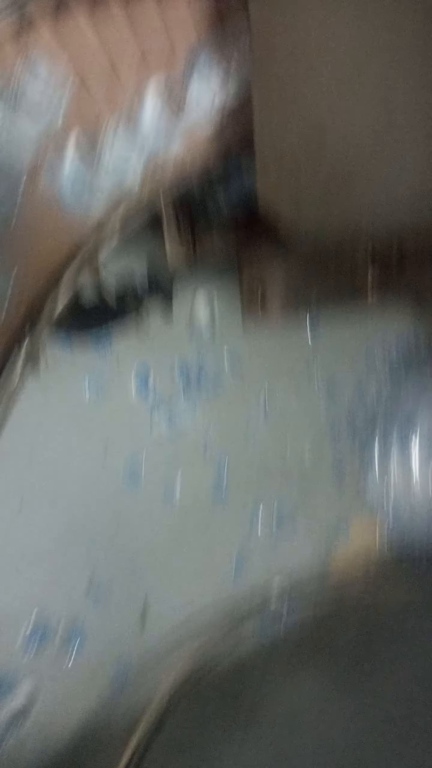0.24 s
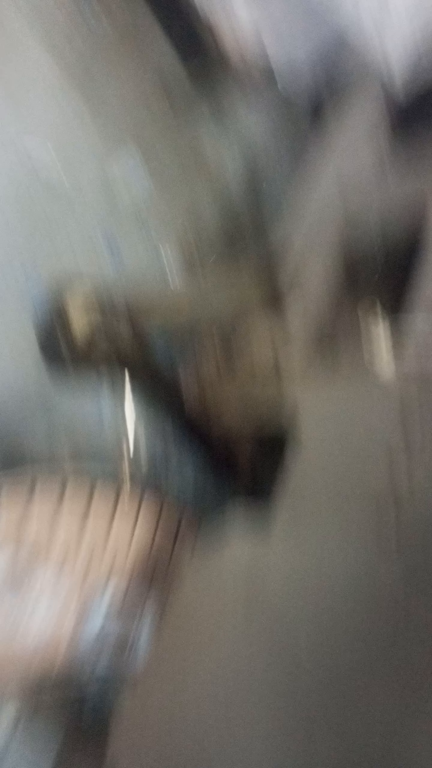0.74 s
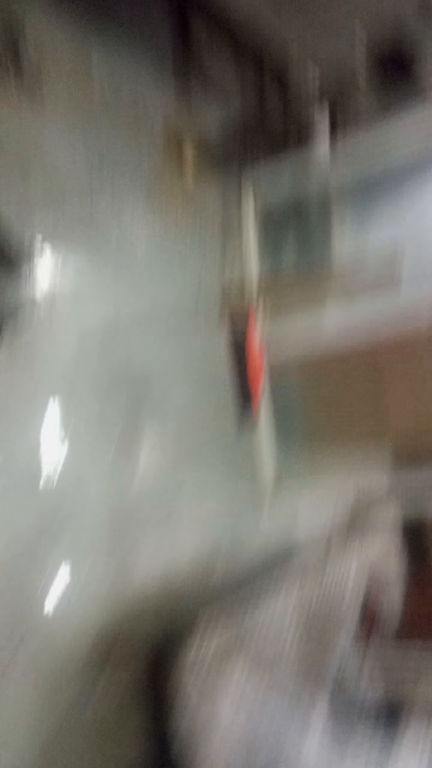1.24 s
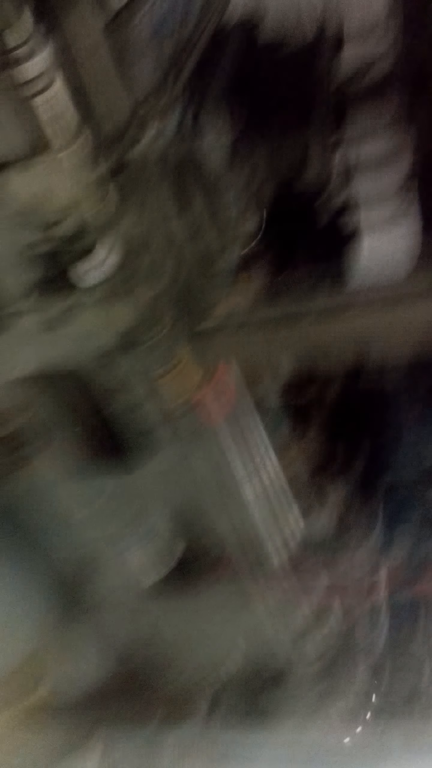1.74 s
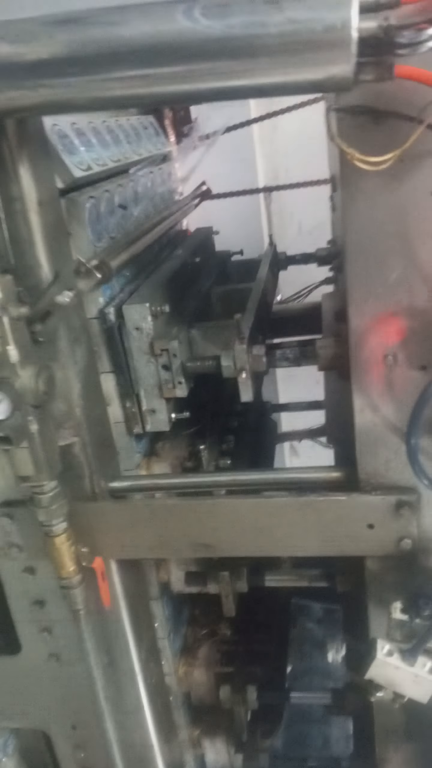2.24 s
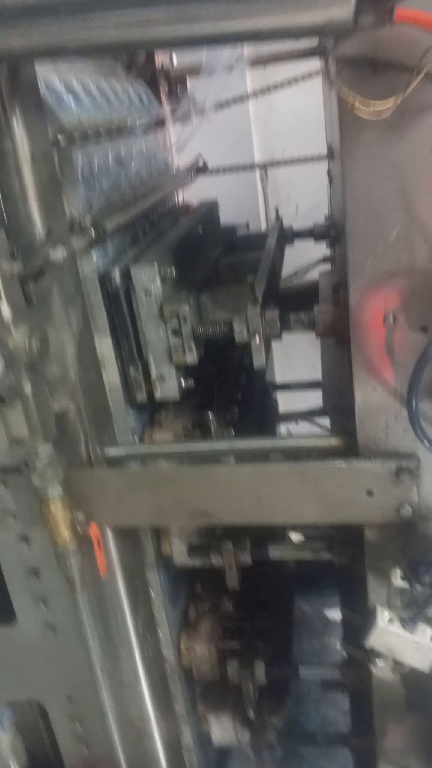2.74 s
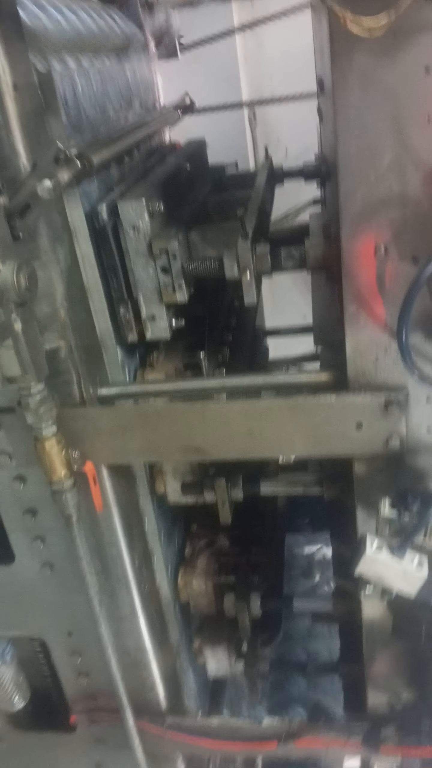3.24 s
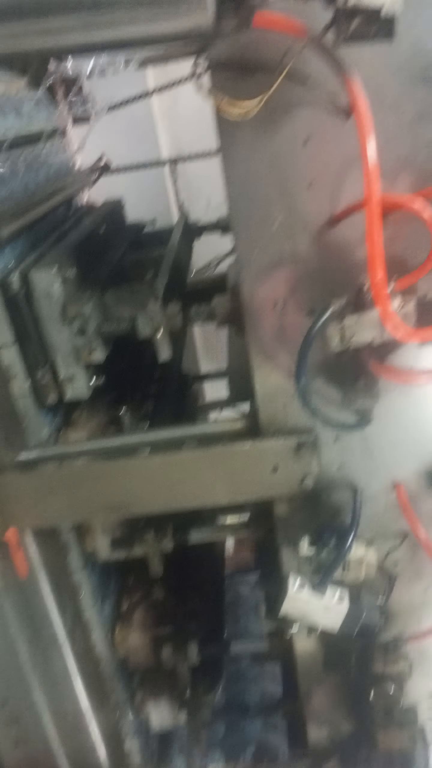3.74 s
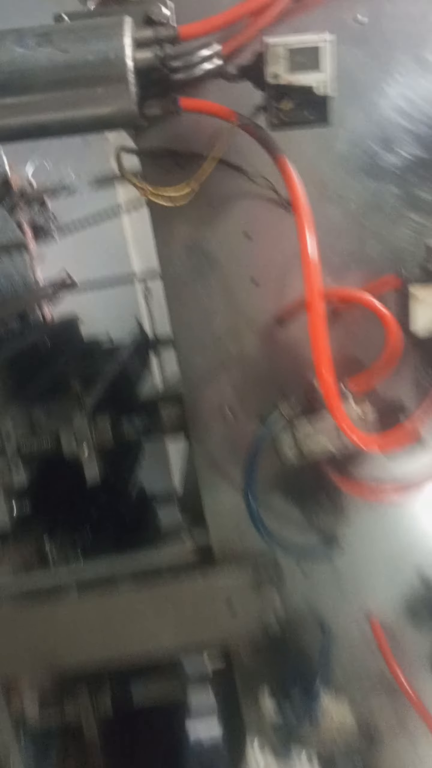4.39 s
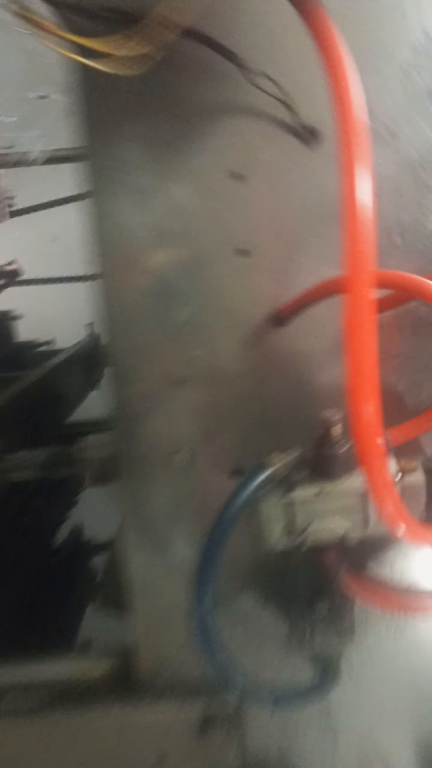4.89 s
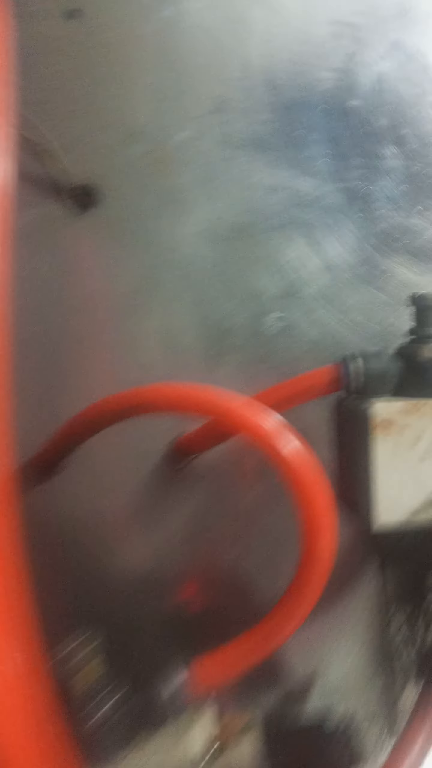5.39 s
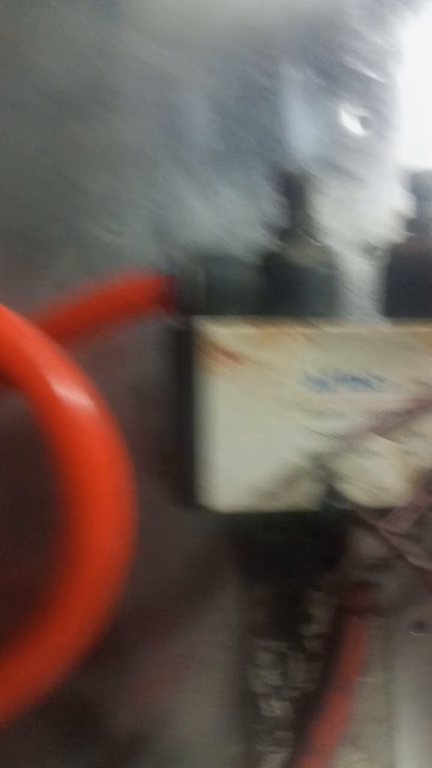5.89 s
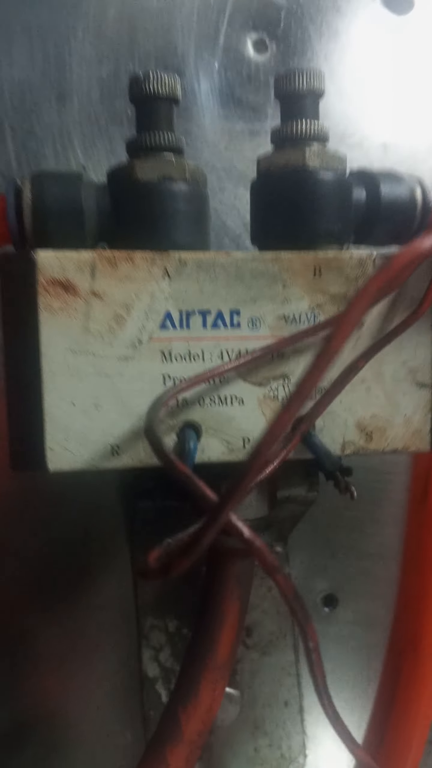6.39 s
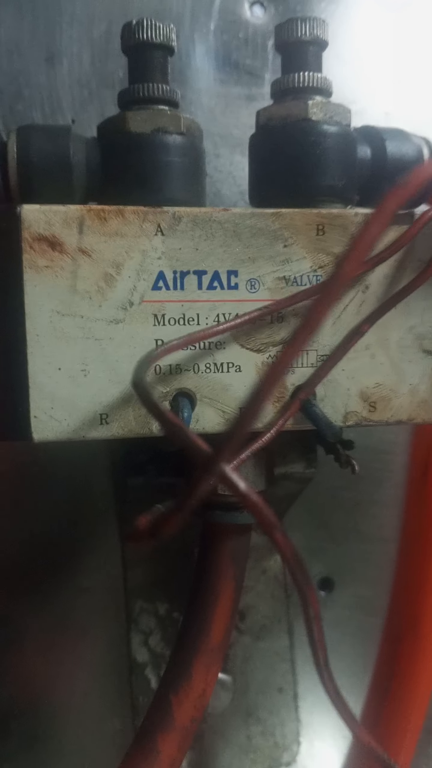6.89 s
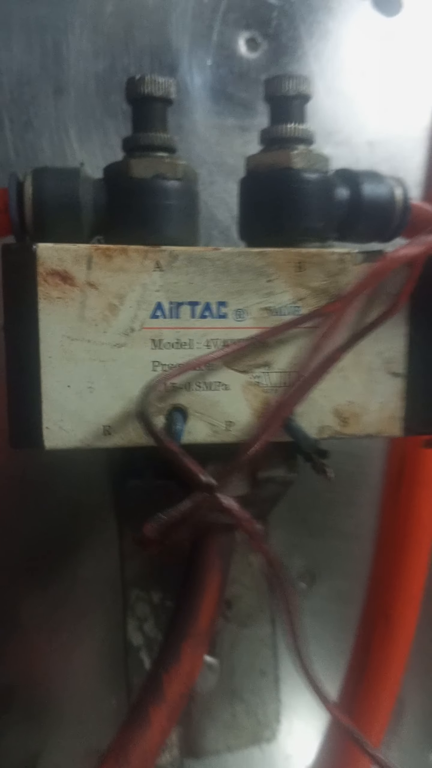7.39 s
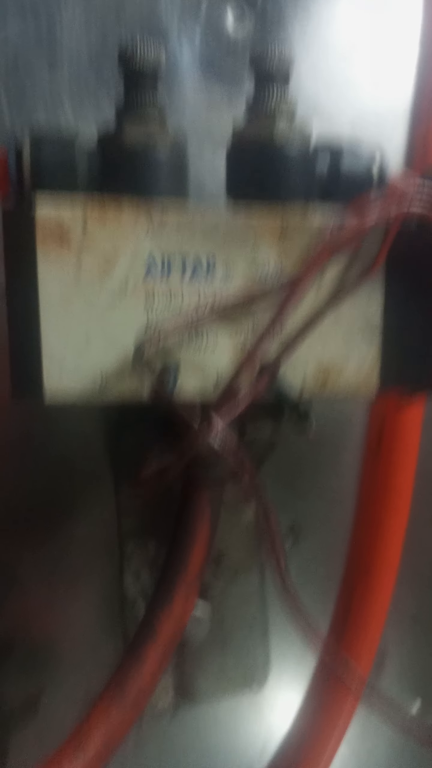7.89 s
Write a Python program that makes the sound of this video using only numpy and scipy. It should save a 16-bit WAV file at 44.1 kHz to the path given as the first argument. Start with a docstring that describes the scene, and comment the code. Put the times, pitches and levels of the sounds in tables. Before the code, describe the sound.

A pneumatic bottle machine cycles in a factory hall. A big air blast swells and snaps at about one second, softer spurts and rumbles follow, and another strong blast comes near four. The air thins to a faint hiss before seven, then a sharp valve click releases fresh gusts. A moving phone picks it up close, slightly watery and compressed.

```python
"""In a factory hall, a pneumatic bottle filler cycles about every three seconds, heard by a moving phone.
Exhaust air hisses broadly and fine port jets sizzle: both are noise built as random spectra with watery patches.
Cylinder strokes add rush and rumble round shifting resonances; short puffs of noise sing in cavities.
Throttles whistle as wavering sines and valve spools snap as filtered ticks.
Steady leaks and distant machines lie behind; the phone colours, suppresses and limits the sum."""
import sys
import numpy as np
from scipy import signal
from scipy.fft import rfft, irfft, next_fast_len
from scipy.io import wavfile
from scipy.ndimage import uniform_filter1d

SR = 44100
rng = np.random.default_rng(int(sys.argv[2]) if len(sys.argv) > 2 else 0)


def bounce(signal):
    """Save signal as a 16-bit WAV file at the path given by the first command-line argument."""
    frames = np.transpose(np.atleast_2d(signal))
    limited = np.clip(frames, -1, 1)
    pcm = np.round(limited * 32767).astype(np.int16)
    wavfile.write(sys.argv[1], SR, pcm)


N = 358533  # samples
CONTROL_S = np.arange(0, N / SR + .1, .002)  # time grid of the slow level curves

# Air escaping from the exhausts.
# Each row: time in seconds, level in dB, brightness in dB per octave.
EXHAUST = [(0.0, -20, .5), (0.6, -24.5, -5), (1.04, -27, -4), (1.06, -20, 4.5), (1.27, -11, 3.5),
           (1.43, -10.5, .5), (1.48, -16, 1.5), (1.86, -19, -.2), (2.26, -22.5, -3), (2.29, -19, -0.5),
           (2.38, -19.5, 3), (2.4, -24.5, 2.5), (2.56, -15.5, -.5), (2.8, -21, -1), (3.01, -17, .7),
           (3.55, -25.5, -4.5), (3.96, -27, -3.5), (4.07, -22, 3.5), (4.2, -8.5, 3.5), (4.24, -14.5, 0.5),
           (4.39, -11, 2), (4.64, -20.5, 0), (4.73, -17, 0.1), (5.14, -19.5, 1.1), (5.28, -17.5, 2),
           (5.3, -23.5, 1.5), (5.43, -16.5, .1), (5.62, -16, -0.7), (5.93, -20, 1.5), (6.11, -17, 1.8),
           (6.5, -25.5, -2), (6.73, -33.5, -4.5), (6.89, -35.5, -10), (6.91, -28.5, 4), (7.04, -29.5, 3),
           (7.14, -21, 3), (7.19, -26.5, 0), (7.38, -25.5, 4), (7.61, -20.5, 0), (7.7, -23.5, 3.5),
           (7.83, -18.5, 1.7), (8.13, -21, 1.9)]
# How much of the finest hiss reaches the moving phone.
# Each row: time in seconds, gain in dB.
TREBLE_REACH = [(0.0, -4), (.9, -3), (1.7, -0.5), (2.9, 0.5), (4.2, -2.5), (5.5, 4), (6.3, -1), (6.85, 4.5),
                (7.0, -7), (7.5, 1.5), (8.13, 2)]


def hiss():
    """Jet noise of the exhausts: its spectrum tips about 4 kHz as the pressure changes."""
    # Each row: frequency in Hz, relative density in dB per Hz.
    colour = [(900, -35.5), (1750, -12.5), (2200, -2), (3200, -1), (4500, -3), (6200, -1), (7200, -11),
              (8600, -18), (9500, -32), (13000, -50), (16000, -36)]

    def shape_db(hz, t):
        brightness = follow(EXHAUST, t)[1]
        octaves = np.log2(np.clip(hz, 2300, 6200) / 4000)
        return read(colour, hz) + brightness * octaves

    return patchy_noise(shape_db, lambda t: follow(EXHAUST, t)[0], (2000, 7000), frame=1024,
                        patch_hz=90, patch_s=.045, flicker_db=0.61, depth=patch_depth)


def sizzle():
    """Jet noise scales up in frequency as the opening narrows: fine ports give a high peak and a fizz below."""
    # Each row of both: frequency in Hz, relative density in dB per Hz.
    peak_colour = [(12500, -36), (13900, -12), (14600, -11), (15300, -4), (16000, 4)]
    fizz_colour = [(7000, -28), (8500, 0), (9500, 0.5), (11500, -5), (13200, -10), (15000, -14)]
    peak = patchy_noise(lambda hz, t: read(peak_colour, hz), jets, (14200, 15700),
                        frame=256, patch_hz=400, patch_s=.025, flicker_db=0.5, depth=patch_depth)
    fizz = patchy_noise(lambda hz, t: read(fizz_colour, hz), fizzing, (9300, 10900),
                        frame=512, patch_hz=200, patch_s=0.021, flicker_db=1.3, depth=patch_depth)
    return peak + fizz


def jets(t):
    """Level in dB of flow through a valve port: quick opening, slow sag, quick shutting, trapped air bleeding."""
    # Valve ports opening near the phone. Each row: start in seconds, time open in seconds,
    # level of the fine jet in dB, level of its after-bleed relative to that in dB.
    ports = [(-.1, .13, -35, -12), (.12, .42, -48, -10), (.91, .13, -46, -10), (1.054, .49, -26.5, -11),
             (2.275, 0.29, -33.5, -11), (2.85, .22, -39, -7), (3.974, .57, -30, -5), (5.205, .45, -38, -5),
             (5.94, 0.19, -39, -5), (6.9035, 0.48, -30, -3), (7.682, .2, -42, -5), (8.0, .2, -38, -8)]
    rise_s, sag_db_per_s, shut_db_per_s = 0.016, 1, 220
    tail_db_per_s, steady_leak_db = 13, -53
    start, open_s, db, tail_db = np.transpose(ports)[:, :, None]
    age = CONTROL_S - start
    shut = np.maximum(age - open_s, 0)
    opening_db = 20 * np.log10(np.clip(age / rise_s, 1e-4, 1))
    flow_db = db - sag_db_per_s * np.minimum(age, open_s) + opening_db
    closing_db = power_sum(-shut_db_per_s * shut, tail_db - tail_db_per_s * shut)
    leak_db = steady_leak_db + follow(TREBLE_REACH, CONTROL_S)[0]
    return np.interp(t, CONTROL_S, power_sum(leak_db, *(flow_db + closing_db)))


def fizzing(t):
    """Powers of unrelated flows add: fizz in dB follows the exhaust air, more when it is bright, and the jets."""
    level_db, brightness = follow(EXHAUST, t)
    exhaust_db = -43 + 0.65 * (level_db + 16) + brightness
    jet_db = jets(t) - 21
    return power_sum(exhaust_db, jet_db) + follow(TREBLE_REACH, t)[0]


def patch_depth(t):
    """Watery patchiness left by the phone's noise suppression: a depth factor that grows while near valves sizzle."""
    slow_jet_db = uniform_filter1d(jets(t), size=40)
    return np.clip(1.05 + 0.028 * (slow_jet_db + 40), .3, 2.2)


def rush():
    """Cavity resonance: hose and cylinder air gathers round a centre that each stroke shifts."""
    # Each row: ratio to the centre frequency, relative density in dB per Hz.
    resonance = [(.3, -17), (.6, -4), (.85, -2), (1.01, -1), (1.2, 0.5), (1.7, -3.5), (3, -14), (9, -60)]
    flow = strokes(column=4, share=1, sag=0.066, idle_db=-45.5, idle_hz=1200)
    return patchy_noise(lambda hz, t: read(resonance, hz / follow(flow, t)[1]),
                        lambda t: follow(flow, t)[0], (600, 1800), frame=1024,
                        patch_hz=90, patch_s=.04, flicker_db=0.24, depth=patch_depth)


def rumble():
    """Structural resonance: the frame vibrates as noise and each stroke favours another panel."""
    # Each row: ratio to the centre frequency, relative density in dB per Hz.
    resonance = [(.25, -11), (.6, -4.5), (1.01, -3), (1.5, -4), (2.5, -10), (5, -34), (15, -60)]
    shake = strokes(column=6, share=1.037, sag=0.36, idle_db=-47.5, idle_hz=294)
    return patchy_noise(lambda hz, t: read(resonance, hz / follow(shake, t)[1]),
                        lambda t: follow(shake, t)[0], (70, 550), frame=2048,
                        patch_hz=60, patch_s=.05, flicker_db=0.33, depth=lambda t: .9)


def strokes(column, share, sag, idle_db, idle_hz):
    """Power-weighted resonance: strokes rise, hold and fall, and the loudest sets the centre.

    Returns rows of time (s), level (dB), centre (Hz); share scales the hold, sag is the
    drop of the centre in octaves over a fall."""
    # Cylinder strokes. Each row: start, rise, hold and fall in seconds, rush level in dB,
    # rush centre in Hz, rumble level in dB, rumble centre in Hz.
    cylinders = [(-.1, 0.042, 0.065, 0.063, -39, 680, -21, 170),
                 (0.176, 0.03, 0.035, .15, -52, 870, -39, 270),
                 (.44, 0.092, .05, 0.091, -49, 1500, -39.5, 380),
                 (0.562, 0.065, .03, 0.46, -33.5, 1350, -34, 257),
                 (.9, .08, 0.034, .1, -44, 1300, -37, 236), (0.988, 0.16, .17, .12, -19, 1200, -24.5, 370),
                 (1.293, 0.067, 0.083, 0.25, -17.5, 1050, -21.5, 244),
                 (1.423, 0.1, 0.2, 0.19, -25, 1200, -27.5, 326),
                 (1.69, 0.077, 0.083, 0.18, -33, 694, -22.5, 283),
                 (1.801, 0.099, 0.058, 0.089, -28.5, 720, -19.5, 271),
                 (1.99, 0.044, 0.05, 0.044, -35.5, 1200, -31.5, 204),
                 (2.269, 0.031, 0.073, 0.054, -22.5, 1170, -29, 420),
                 (2.392, 0.13, 0.026, .13, -22, 1030, -27.5, 400),
                 (2.496, 0.073, 0.093, .06, -33, 705, -22.5, 262),
                 (2.669, 0.022, 0.062, 0.087, -37.5, 1540, -30, 140),
                 (2.826, 0.12, 0.071, 0.12, -23, 890, -21, 242),
                 (3.011, 0.029, 0.043, 0.059, -48, 900, -24.5, 175),
                 (3.43, 0.055, .03, .1, -38, 1620, -58, 350),
                 (3.6, 0.073, 0.051, 0.091, -36.5, 1490, -60, 330),
                 (3.933, 0.23, .06, .1, -19.5, 1170, -24.5, 300),
                 (4.235, 0.046, 0.21, 0.32, -18.5, 1020, -21.5, 344),
                 (4.624, .11, 0.1, 0.041, -24.5, 1250, -33, 393),
                 (4.83, 0.055, 0.042, 0.055, -37, 1050, -27, 250),
                 (4.912, 0.034, 0.073, 0.12, -30.5, 1087, -30.5, 350),
                 (5.014, 0.055, 0.058, 0.12, -29.5, 1260, -27, 343),
                 (5.164, 0.066, 0.03, 0.11, -26, 1350, -32, 184),
                 (5.266, 0.16, .06, 0.21, -24, 1400, -33.5, 289),
                 (5.559, 0.054, 0.076, 0.066, -31, 1317, -32, 410),
                 (5.705, .04, 0.099, 0.022, -40, 1190, -31, 154),
                 (5.891, 0.05, 0.092, 0.065, -33.5, 1200, -29.5, 167),
                 (5.993, 0.07, .05, .14, -25.5, 1120, -39, 324),
                 (6.103, 0.044, 0.019, 0.077, -41, 1300, -27, 300),
                 (6.886, 0.021, 0.1, .1, -36.5, 1340, -51, 244),
                 (6.996, .13, 0.029, 0.041, -23.5, 1250, -30.5, 456),
                 (7.15, 0.14, 0.3, 0.14, -29, 1300, -48, 290),
                 (7.413, 0.16, 0.055, 0.068, -21.5, 1200, -30, 427),
                 (7.622, 0.13, 0.093, .1, -25.5, 1370, -30.5, 376),
                 (7.805, 0.063, 0.051, 0.17, -24.5, 1040, -28.5, 164),
                 (7.945, 0.058, 0.16, .1, -29.5, 1400, -31.5, 336)]
    range_db = 25  # climb in a rise, drop in a fall
    rows = np.transpose(cylinders)[:, :, None]
    start, rise, hold, fall = rows[:4]
    age = CONTROL_S - start
    fallen = np.maximum(age - rise - share * hold, 0) / fall
    below = np.maximum(rise - age, 0) / rise + fallen
    power = gain_of(rows[column] - range_db * below) ** 2 * (age > 0)
    idle_power = gain_of(idle_db) ** 2
    total = power.sum(axis=0) + idle_power
    octaves = np.log2(rows[column + 1]) - sag * np.minimum(fallen, 1)
    centre = ((power * octaves).sum(axis=0) + idle_power * np.log2(idle_hz)) / total
    return np.transpose([CONTROL_S, 10 * np.log10(total), 2 ** centre])


def puffs():
    """Noise-driven cavity resonance: narrow noise on a carrier that climbs and drifts, swelling and shutting off."""
    # Each row: start in seconds, length in seconds, share of the length spent rising,
    # centre in Hz, width in Hz, level at the top of the swell in dB.
    cavities = [(.635, 0.081, 0.44, 224, 120, -29.5), (0.63, 0.15, 0.13, 1400, 300, -30.5),
                (0.642, 0.1, 0.12, 2128, 550, -25), (0.711, 0.09, 0.49, 623, 218, -36),
                (1.74, 0.11, 0.28, 2656, 1200, -21.5), (2.29, 0.13, .4, 3280, 252, -32),
                (2.69, .08, .4, 2700, 200, -27.5), (2.86, .1, .4, 12300, 600, -44),
                (3.452, 0.065, 0.47, 2310, 450, -24), (3.681, 0.13, 0.43, 1505, 240, -33),
                (5.8, 0.046, .4, 1620, 141, -30), (4.79, 0.12, .45, 970, 200, -31),
                (4.797, .3, 0.33, 414, 90, -32), (5.051, 0.081, 0.35, 365, 110, -27),
                (5.234, 0.091, .45, 1380, 260, -30), (5.43, 0.081, 0.36, 1010, 200, -32),
                (5.501, 0.071, 0.4, 516, 120, -30.5), (5.6, 0.12, 0.6, 488, 96, -32),
                (6.2, 0.56, 0.083, 2680, 250, -28.5), (6.927, 0.68, 0.55, 1338, 275, -32.5),
                (6.982, 0.096, 0.37, 4900, 250, -33), (7.05, .12, 0.8, 4600, 1940, -13.5),
                (7.241, .089, 0.49, 1640, 290, -31), (7.41, 0.11, .45, 3884, 300, -28),
                (7.442, .09, 0.71, 5650, 250, -27), (7.45, 0.24, 0.27, 12300, 900, -39),
                (7.46, 0.179, 0.53, 460, 130, -26.5), (7.518, 0.19, .4, 3400, 300, -23.5),
                (7.548, 0.096, 0.37, 5360, 370, -30), (7.6, 0.075, 0.59, 200, 102, -36),
                (7.924, 0.12, .42, 2440, 200, -28)]
    climb, wander, wander_s = .04, .025, .05  # shares of the centre; pace of the drift
    out = np.zeros(N)
    for s, length, rise, hz, width, level_db in cavities:
        t = np.arange(0, length, 1 / SR)
        a, b, drift = rng.standard_normal((3, SR))
        # Low-passed complex noise, moved up by the carrier, becomes a band of the full width.
        lowpass = signal.butter(3, width / 2, fs=SR, output="sos")
        noise = evened(signal.sosfilt(lowpass, a)) + 1j * evened(signal.sosfilt(lowpass, b))
        drift = uniform_filter1d(drift, round(wander_s * SR))
        drift = evened(uniform_filter1d(drift, size=800))
        centre = hz * (1 + climb * (t / length - .5) + wander * drift[:len(t)])
        carrier = np.exp(2j * np.pi * np.cumsum(centre) / SR)
        sung = (noise[-len(t):] * carrier).real
        swell = np.interp(t / length, [0, np.clip(rise, .05, .95), 1], [0, 1, 0]) ** 1.5
        out[round(s * SR):][:len(t)] += gain_of(level_db) * swell * sung
    return out


def whistles():
    """Edge tones of air in the throttles: a sine that sags, sputters and wavers."""
    # Each row: start in seconds, length in seconds, mean pitch in Hz, starting level in dB,
    # change of level over the length in dB.
    throttles = [(1.84, .04, 11330, -50, -9), (1.89, .105, 11200, -39.5, 4), (1.991, 0.11, 11185, -42, 6),
                 (2.875, .035, 12430, -46, .1), (2.897, 0.15, 11880, -33, -22),
                 (2.9, 0.068, 12150, -42, -8), (4.95, 0.081, 11100, -44, -1.1),
                 (5.047, 0.13, 11190, -35.5, .1), (8.033, .09, 11120, -52, 8)]
    sag_hz_per_s, waver_hz, sputter_db = 230, 12, 3.9
    out = np.zeros(N)
    for s, length, hz, level_db, change_db in throttles:
        t = np.arange(0, length, 1 / SR)
        slow = uniform_filter1d(rng.standard_normal((2, SR)), size=500)
        waver, sputter = evened(slow, axis=1)[:, :len(t)]
        pitch = hz - sag_hz_per_s * (t - length / 2) + waver_hz * waver
        tone = np.sqrt(2) * np.sin(2 * np.pi * np.cumsum(pitch) / SR)
        gain = gain_of(level_db + change_db * t / length + sputter_db * sputter)
        whistle = gain * tone * signal.windows.tukey(len(t), .3)
        part = out[round(s * SR):][:len(t)]
        part += whistle[:len(part)]
    return out


def snaps():
    """Impact excitation: each valve spool snaps over with a sharp broad tick and a little rattle behind it."""
    # Each row: time in seconds, peak level in dB.
    spools = [(1.054, -15), (2.282, -19), (3.974, -20), (6.9035, -11)]
    out, t = np.zeros(N), np.arange(400) / SR
    band = signal.butter(3, [300, 7000], "band", fs=SR)
    for s, peak_db in spools:
        rattle = 0.16 * rng.standard_normal(len(t)) * np.exp(-t / 0.0013)
        crack = signal.lfilter(*band, (t == 0) + rattle)
        out[round(s * SR):][:len(t)] += gain_of(peak_db) * crack / abs(crack).max()
    return out


def hall():
    """Many distant sources sum to steady noise: leaks and machines in the hall, far and even."""
    # Each row: frequency in Hz, relative density in dB per Hz.
    colour = [(60, -19), (130, -1), (400, 4), (800, -1), (1500, -17), (1900, -18), (2600, -6.5), (6500, 1),
              (7400, 0), (9000, -2.5), (9500, -54), (13500, -36), (15000, -16), (16000, -16)]
    return patchy_noise(lambda hz, t: read(colour, hz), lambda t: -36.5, (50, 16000), frame=1024,
                        patch_hz=300, patch_s=0.089, flicker_db=.2, depth=lambda t: .25)


def patchy_noise(shape_db, level_db, band, frame, patch_hz, patch_s, flicker_db, depth):
    """Noise as random short-time spectra: suppression leaves watery patches in time and frequency.

    level_db sets the power inside band (Hz); a flicker shakes all bins together."""
    # Each row: frequency in Hz, depth of the watery patches in dB where the depth factor is 1.
    patchy = [(100, 1), (500, 5), (1500, 2), (4000, 2.5), (9000, 2.5), (15000, 1.5)]
    hop = frame // 4
    t = np.arange(N // hop + 5) * hop / SR
    hz = np.fft.rfftfreq(frame, 1 / SR)[:, None]
    a, b, patches = rng.standard_normal((len(t), len(hz), 3)).T
    for _ in range(2):
        patches = uniform_filter1d(patches, max(1, round(patch_hz * frame / SR)), axis=0)
        patches = uniform_filter1d(patches, max(1, round(patch_s * SR / hop)), axis=1)
    flicker = evened(uniform_filter1d(rng.standard_normal(len(t)), size=3))
    shape = gain_of(shape_db(hz, t) + 0 * t)
    inside = (hz[:, 0] > band[0]) & (hz[:, 0] < band[1])
    shape = shape / np.sqrt((shape[inside] ** 2).sum(axis=0))  # unit power in the band at every moment
    patch_db = read(patchy, hz) * depth(t)
    mean_db = patch_db ** 2 * np.log(10) / 20  # taken off so that patches keep the mean power
    chance = gain_of(patch_db * evened(patches) + flicker_db * flicker - mean_db)
    z = (a + 1j * b) * shape * chance * np.sqrt(2) / 2
    noise = signal.istft(z, nperseg=frame, noverlap=frame - hop)[1][:N]
    return gain_of(level_db(np.arange(N) / SR)) * noise


def suppress(x, share, floor_db):
    """Spectral subtraction by the phone: takes a share of each bin's slow mean power, down to a floor."""
    z = signal.stft(x, nperseg=1024, noverlap=896)[2]
    power = abs(uniform_filter1d(abs(z) ** 2, size=7, axis=-1)) + 1e-20
    steady = uniform_filter1d(power, size=170, axis=-1)
    steady = uniform_filter1d(steady, size=5, axis=-2)
    kept = np.maximum(1 - share * steady / power, gain_of(2 * floor_db))  # power ratio
    return signal.istft(z * np.sqrt(kept) * gain_of(hush(z)), nperseg=1024, noverlap=896)[1][:N]


def hush(z):
    """Release overshoot of the suppressor: dB gain that dips the low bins below a slowly falling peak."""
    below_hz, memory_db_per_s = 1500, 70
    from_db, slope, most_db = 8, 1.2, 8
    low = np.fft.rfftfreq(1024, 1 / SR) < below_hz
    low_power = (abs(z[low]) ** 2).sum(axis=0)
    now_db = 10 * np.log10(uniform_filter1d(low_power, size=5) + 1e-20)
    fall_db = np.arange(len(now_db)) * 128 / SR * memory_db_per_s
    peak_db = np.maximum.accumulate(now_db + fall_db) - fall_db
    under_db = peak_db - now_db
    cut_db = np.clip(slope * (under_db - from_db), 0, most_db)
    return -np.outer(low, uniform_filter1d(cut_db, size=5))


def gain_of(db):
    """Logarithmic level: decibels to amplitude."""
    return 10 ** (np.asarray(db) / 20)


def power_sum(*levels_db):
    """Incoherent addition: level of several unrelated sounds together."""
    return 10 * np.log10(sum(gain_of(db) ** 2 for db in levels_db))


def evened(x, axis=None):
    """Energy normalization: scales to rms 1."""
    return x / np.sqrt(np.mean(x ** 2, axis=axis, keepdims=True) + 1e-20)


def read(points, hz):
    """Logarithmic frequency scale: interpolates a spectrum along it."""
    f, value = np.transpose(points)
    return np.interp(np.log(hz + 1e-3), np.log(f), value)


def follow(rows, t):
    """Linear interpolation: reads every column of a curve at the times t."""
    s, *columns = np.transpose(rows)
    return [np.interp(t, s, c) for c in columns]


def scene():
    """Superposition: the pressures of all sources add at one microphone."""
    air = hall() + hiss() + sizzle() + rush()
    machine = rumble() + puffs() + whistles() + snaps()
    return np.tile(air + machine, (2, 1))


def record(dry):
    """Transducer chain: a small microphone with weak deep bass, suppressor, soft overload, then a band limit."""
    # Each row: frequency in Hz, gain in dB.
    response = [(20, -15), (60, -6.5), (110, 3), (150, 2), (16000, 2.5)]
    edge_hz = 15800
    size = next_fast_len(N)
    gain = gain_of(read(response, np.fft.rfftfreq(size, 1 / SR)))
    coloured = irfft(rfft(dry[0], size) * gain, size)[:N]
    cleaned = gain_of(1.5) * suppress(coloured, share=0.53, floor_db=-0.5)
    limited = .85 * np.tanh(cleaned / .85)
    lowpass = signal.firwin(1023, edge_hz, window=("kaiser", 9), fs=SR)
    out = signal.oaconvolve(limited, lowpass, "same")
    return np.tile(out, (2, 1))


dry = scene()
out = record(dry)
bounce(out)
```